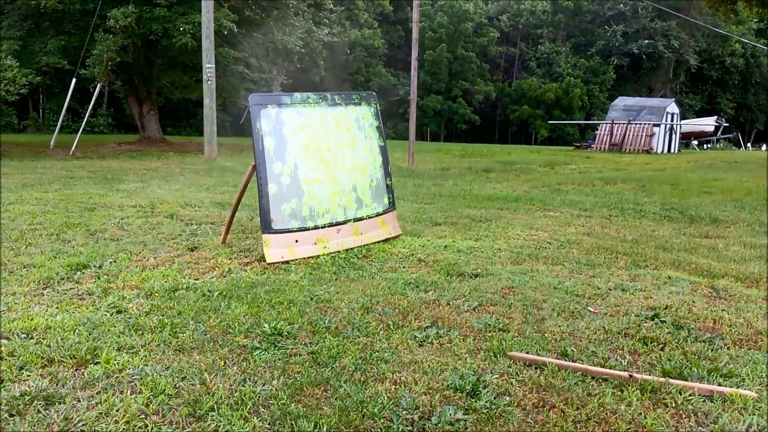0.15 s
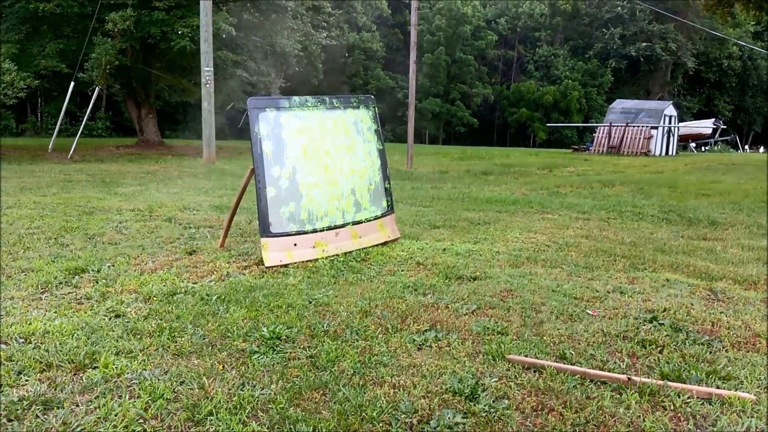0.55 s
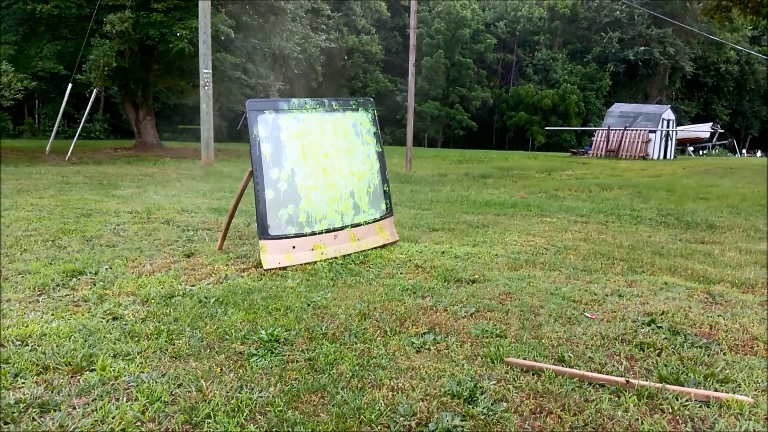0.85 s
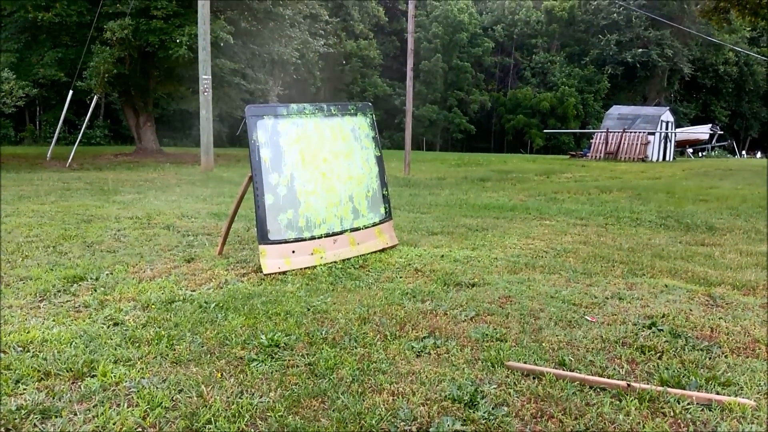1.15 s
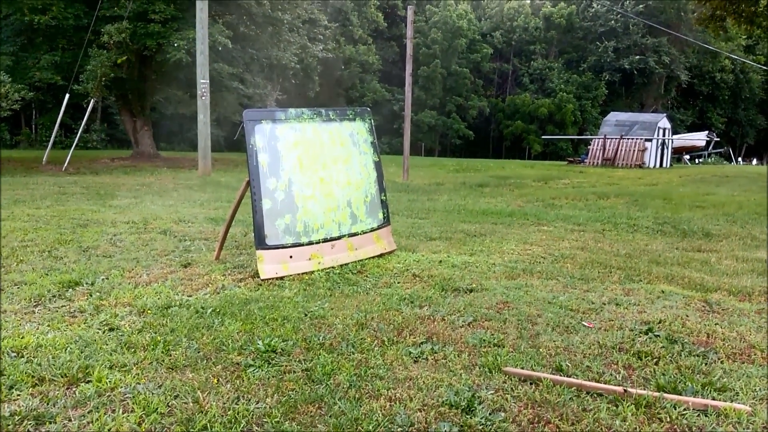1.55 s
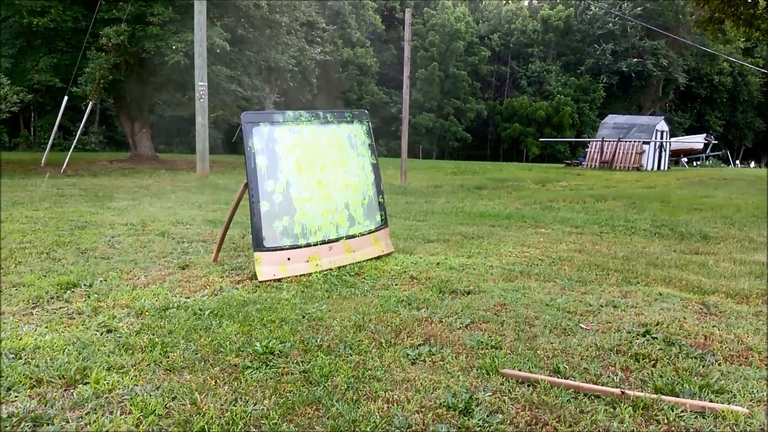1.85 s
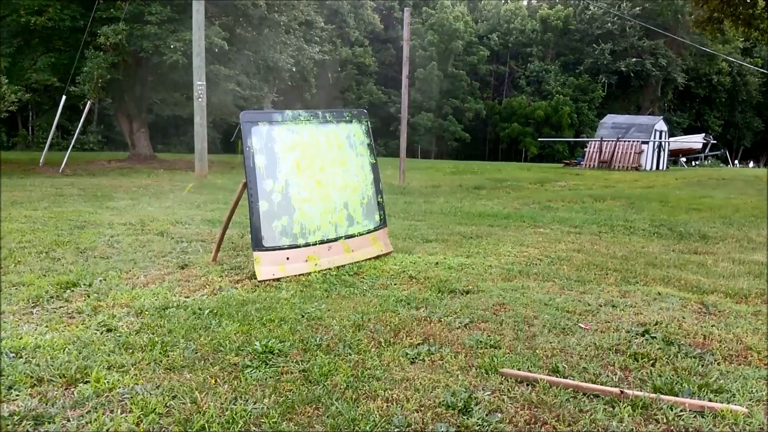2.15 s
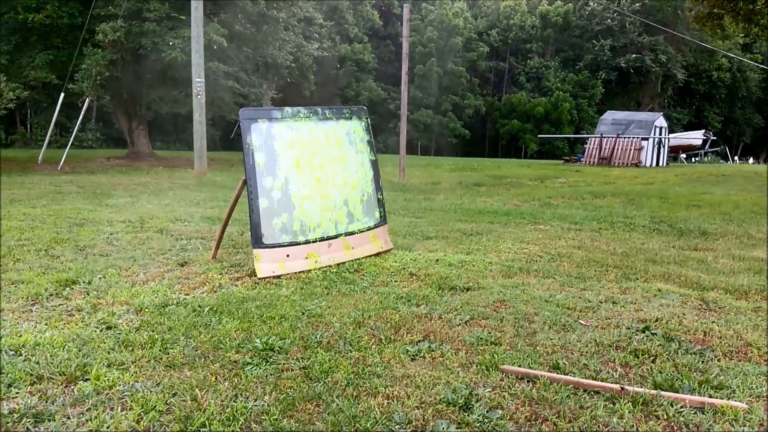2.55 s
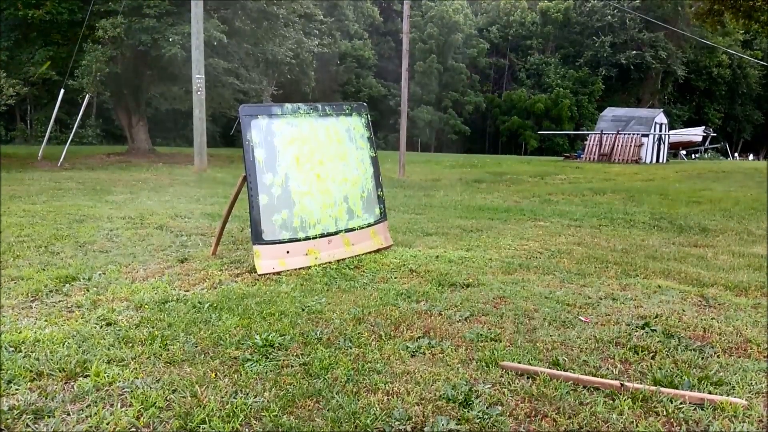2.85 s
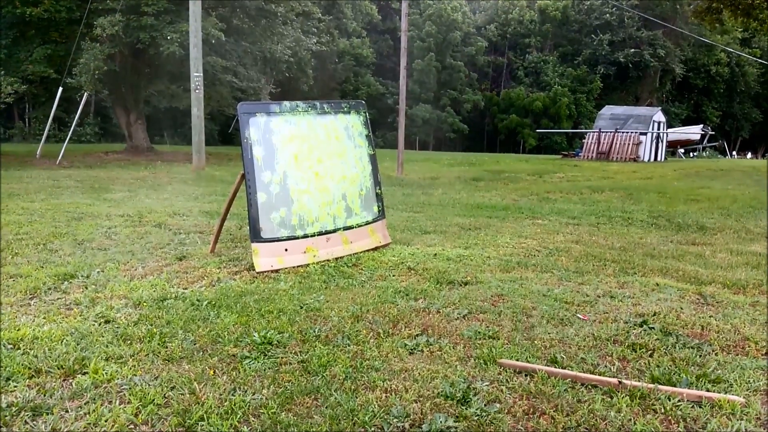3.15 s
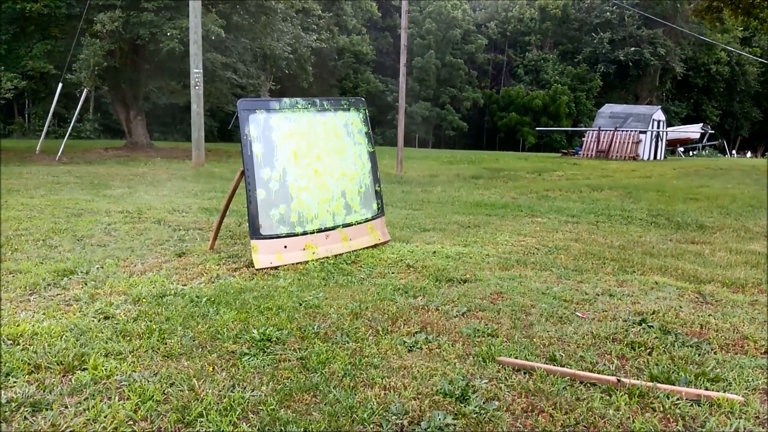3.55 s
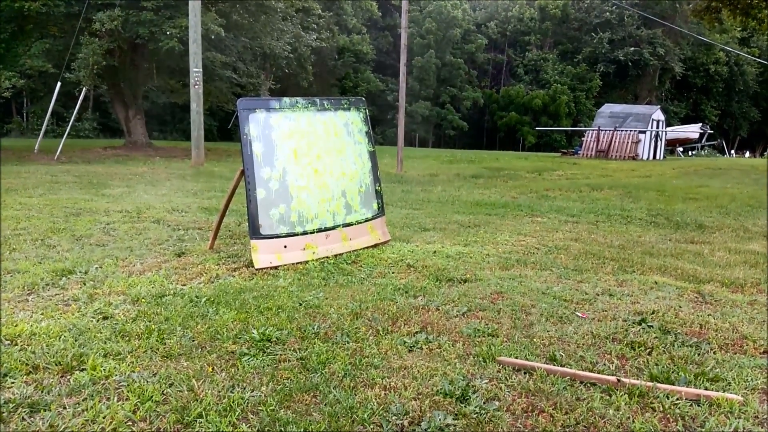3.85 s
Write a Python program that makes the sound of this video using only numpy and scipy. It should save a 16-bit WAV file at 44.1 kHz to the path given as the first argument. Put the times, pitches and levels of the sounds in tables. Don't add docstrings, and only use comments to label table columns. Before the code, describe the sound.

Paintballs pop and splat rapidly against a stiff panel outdoors, then the echo fades to quiet.

```python
import sys
import numpy as np
from scipy import signal
from scipy.fft import rfft, irfft, next_fast_len
from scipy.io import wavfile
from scipy.ndimage import uniform_filter1d

SR = 44100
rng = np.random.default_rng(int(sys.argv[2]) if len(sys.argv) > 2 else 0)


def unload_audio(sound):
    columns = np.transpose(np.atleast_2d(sound))
    steps = np.round(np.clip(columns, -1, 1) * 32767)
    wavfile.write(sys.argv[1], SR, steps.astype(np.int16))


def volts_from_db(level):
    exponent = np.asarray(level, float) / 20
    return 10 ** exponent


N = 176400

# f/Hz, density/dB per Hz
LAWN_SPECTRUM = [(18, -33.5), (30, -12.5), (124, -3), (157, -5), (355, -13), (540, -16.5), (1430, -17.5),
                 (1540, -21.5), (16000, -37.5)]
# f/Hz, left/dB, right/dB, t60/s, near part/dB
TREE_BANDS = [(165, -51.5, -25, 0.4, 4.5), (710, -40, -41, 1.4, 6.5), (1364, -39.5, -36.5, 3.58, 5),
              (2610, -43.5, -39.5, 1.36, 3), (3956, -35, -31.5, 1.8, 9), (4990, -41, -36.5, 1.4, 2),
              (7100, -48.5, -52, 1.1, -8), (13020, -71.5, -71, 1.1, 9)]
# t/s, level/dB
EARLIER_HITS = [
    (-.2, -4),
    (-.1, -3.5),
    (-.045, -15.5),
]
# t/s, level/dB, thud/dB, ring/dB
SINGLE_HITS = [
    (0.011, -11.5, 5.5, -4),
    (0.0633, -14.5, 12.5, -0.5),
    (0.146, -10, 3.5, 0.5),
    (0.245, -13, 3, -1),
    (0.4873, -10.5, -2, -11),
    (0.7473, -11, 3, -6),
    (0.8743, -11.5, 2.5, 1),
    (0.9855, -9, 4.5, 2),
    (2.3412, -10.5, 4, -13.5),
    (2.567, -11, 0.5, -6.5),
]
# t/s, level/dB, thud/dB, ring/dB
RAPID_HITS = [(1.1158, -10, 1.6, -11.5), (1.1671, -13, 1.8, -1.1), (1.2276, -10, 4.2, 1.5),
              (1.2799, -13.5, 1.1, 4), (1.3351, -10, 1.1, -5.5), (1.3895, -10.5, 2.4, 1),
              (1.4375, -11.5, 1.5, -6), (1.498, -10.5, 2.3, -3), (1.5482, -14, 0.81, -0.5),
              (1.5968, -14, 2.3, 4.5), (1.6415, -13.5, 2, -1.5), (1.7009, -12, 0.75, -4),
              (1.755, -12, 2.3, -1.3), (1.8021, -11, 2, -3), (1.8634, -12.5, 1.2, -2), (1.9148, -13, 1, -1),
              (1.9684, -12.5, 3, -1.5), (2.0268, -10, 0.82, -7), (2.0726, -12.5, 1.1, 0),
              (2.1412, -11.5, 0.92, -14), (2.1898, -11.5, 0.59, 6.5), (2.2349, -11.5, 0.94, -1)]
BURST_TREBLE_DB = [1.5, 1.5, 1.5, 1.5, 1.5, 1.5, 1.5, 1.5, 1.5, 1.5, 1.5, 1.5, 1.5, 1.5, 1.5, 1.5, 1.5, 1.5,
                   1.5, 1.5, 1.5, 1.5, 1.5, 1.5, 1.5, 1.5, 1.5, 1.5, 1.5, 1.5, 1.5, 1.5]
# f/Hz, density/dB per Hz
SPLAT_SPECTRUM = [(120, -20), (400, -0.5), (1600, 3.5), (4500, -4.5), (6800, -5), (9100, -2),
                  (13000, -11.5), (16500, -16)]
# f/Hz, level/dB, t60/s
PANEL_MODES = [(73.8, -29.5, 0.033), (119, -28, 0.32), (130, -27.5, 0.45), (161.8, -25, 0.53),
               (175.6, -22, 0.86), (233, -20.5, 0.092), (337, -29, 0.72), (506, -18, 0.084),
               (1090, -11.5, 0.09), (1197, -20, 0.12), (1387, -2, 0.077), (1510, -9, 0.061),
               (1766, -6.5, 0.11), (2638, -21, 0.054)]
# delay/s, left/dB, right/dB, centre f/Hz, width/Hz
HIT_ECHOES = [(.0522, -5, 6, 4000, 1500), (.0522, -20, -12, 3000, 5000), (.0765, -19, -12, 4000, 5000)]
# delay/s, left/dB, right/dB, centre f/Hz, width/Hz
CRACK_ECHOES = [(.0522, -11, -1, 4400, 1800), (.0535, -14, -3, 3650, 500), (.0522, -34, -27, 9000, 8000),
                (.0525, -18, -14, 1700, 1200), (.0765, -24, -16, 4500, 4000), (.0385, -28, -26, 4000, 3000)]
# delay/s, left/dB, right/dB, centre f/Hz, width/Hz
POP_ECHOES = [(.0415, -14, -13, 1100, 2500)]
# t/s, level/dB
SHOTS = [(0.0917, -16), (0.3244, 0.5), (.577, 3.5), (0.7099, 2.5), (.8233, -1), (0.9544, -1),
         (1.0106, -8.5), (1.0639, 0), (1.116, -7.5), (1.169, -18.5), (1.2239, 2), (1.2779, -3.5),
         (1.3332, -1.5), (1.3861, -11), (1.431, -10), (1.4873, -7.5), (1.5404, -3), (1.5918, -3),
         (1.64, -8.5), (1.6969, 1), (1.751, 0.5), (1.804, -4), (1.8568, -2.5), (1.915, -11.5), (1.9803, -8),
         (2.030, -8.5), (2.073, -1.5), (2.128, -13.5), (2.186, -14), (2.4077, 0.5)]
# f/Hz, left/dB, right/dB, t60/s
BARREL_MODES = [(920, -12, -11, .05), (1500, -20, -18, .03), (2000, -22, -17, .03), (3050, -25, -15, .03),
                (4300, -28, -22, .03)]
# t/s, thump/dB, knock/dB
FRAME_HITS = [
    (1.6426, -16, -15),
    (1.7015, -14.5, -26),
    (1.757, -13.5, -30.5),
]
# t/s, level/dB
DRIPS = [
    (3.2447, -58),
    (3.3593, -54.5),
    (3.3723, -50),
    (3.6138, -51),
    (3.7395, -63.5),
    (3.7514, -49.5),
]

CRACK_DELAY_S = 0.000843


def curve(table, hz, col):
    table = np.array(table, float)
    return np.interp(np.log(np.maximum(hz, 1)), np.log(table[:, 0]), table[:, col])


def colour(x, gain):
    size = next_fast_len(x.shape[-1] + 4096)
    hz = np.arange(size // 2 + 1) * SR / size
    return irfft(rfft(x, size) * gain(hz), size)[..., :x.shape[-1]]


def band(x, hz, width_hz):
    return signal.lfilter(*signal.iirpeak(hz, hz / width_hz, SR), x)


def fade(t, t60_s):
    return (t >= 0) * volts_from_db(-60 * np.maximum(t, 0) / t60_s)


def bell(x):
    return np.exp(-.5 * x ** 2)


def stereo(left, right):
    return np.array([[left], [right]])


def add(out, x, s):
    i = int(s * SR)
    part = out[:, i:i + x.shape[1]]
    part += x[:, :part.shape[1]]


def pair(count):
    alike_hz = 586
    a, b = rng.standard_normal((2, count))
    alike = lambda hz: .92 / (1 + (hz / alike_hz) ** 2)
    return np.array([a, colour(a, alike) + colour(b, lambda hz: np.sqrt(1 - alike(hz) ** 2))])


def lawn():
    level_db, pan_db, swell_db = -62.5, -3.5, 2.0
    air = colour(pair(N), lambda f: volts_from_db(curve(LAWN_SPECTRUM, f, 1)))
    swell = uniform_filter1d(uniform_filter1d(rng.standard_normal(N), 8000), 8000)
    return air / air.std() * volts_from_db(level_db + swell_db * swell / swell.std() + pan_db * stereo(.5, -.5))


def trees(x):
    start_s, rise_s, near_t60_s, near_hold_s = .037, .012, .2, 0.17
    treeline_s, beyond_t60_s = 0.35, 5.7
    swell_s, swell_width_s, swell_db = .3, 0.032, 1
    t = np.arange(int(1.3 * SR)) / SR - start_s
    noise = pair(len(t))
    response = 0
    for hz in 80 * 2 ** np.arange(0, 7.8, .5):
        left_db, right_db, t60_s, near_db = (curve(TREE_BANDS, hz, col) for col in (1, 2, 3, 4))
        half_octave = colour(noise, lambda f: np.maximum(0, 1 - 2 * abs(np.log2((f + 1) / hz))))
        held = hz > 6000
        near = fade(t - near_hold_s * held, near_t60_s) + (t < near_hold_s) * held
        response = response + volts_from_db(stereo(left_db, right_db)) * half_octave * (fade(t, t60_s) + volts_from_db(near_db) * near)
    response = response * np.clip(t / rise_s, 0, 1) * volts_from_db(-60 * np.maximum(t - treeline_s, 0) / beyond_t60_s)
    response = response * volts_from_db(swell_db * bell((t - swell_s) / swell_width_s))
    return signal.fftconvolve(x[None], response, axes=1)


def burst(level_db, treble_db, lead_s, pan_db):
    splat_db, shared, lag_s, left_treble_db = 4, 0.31, .00006, 3.5
    rise_s, body_t60_s, top_t60_s = .0004, 0.03, 0.015
    spray_db, spray_t60_s = -34, 0.21
    rebound_s, rebound_db, rebound_t60_s = .0022, -3, .007
    crack_db, crack_width_s = 17, .000012
    u = np.arange(4096) / SR - lead_s
    side = stereo(.5, -.5)

    noise = rng.standard_normal((3, 4096))
    noise = np.sqrt(shared) * noise[0] + np.sqrt(1 - shared) * noise[1:]
    common = noise.sum(axis=0) / 1.5
    noise = noise + signal.sosfilt(signal.butter(1, 800, fs=SR, output="sos"), common - noise)
    top = signal.sosfilt(signal.butter(2, 5000, "high", fs=SR, output="sos"), noise)

    late, strong = rng.standard_normal(2)
    again_s = CRACK_DELAY_S + rebound_s * (1 + 0.13 * late)
    spray = volts_from_db(spray_db) * fade(u, spray_t60_s)
    rebound = volts_from_db(rebound_db + 2 * strong) * fade(u - again_s, rebound_t60_s)
    shape = lambda t60_s: np.clip(u / rise_s, 0, 1) ** 2 * fade(u, t60_s) + spray + rebound

    v = (u - CRACK_DELAY_S) / crack_width_s
    crack = volts_from_db(crack_db + treble_db) * v * bell(v)
    splat = (noise - top) * shape(body_t60_s) + volts_from_db(treble_db) * top * shape(top_t60_s) - crack

    def ports(f):
        tilt_db = pan_db + left_treble_db * (f / 12000) ** 2
        return volts_from_db(curve(SPLAT_SPECTRUM, f, 1) + side * tilt_db) * np.exp(2j * np.pi * f * side * lag_s)

    return volts_from_db(level_db + splat_db) * colour(splat, ports)


def panel_ring(level_db, thud_db, ring_db):
    scatter_db, jitter, port_phase = 4, .07, 0.21
    low_longest_t60_s, high_longest_t60_s = 0.49, 0.053
    t = np.arange(SR // 4) / SR
    hz, db, t60_s = np.array(PANEL_MODES).T[:, :, None]
    phase, level, pitch = rng.standard_normal((3, len(PANEL_MODES), 1))
    low = hz < 600
    gain = volts_from_db(level_db + db + np.where(low, thud_db, ring_db) + scatter_db * level)
    envelope = gain * fade(t, np.minimum(t60_s, np.where(low, low_longest_t60_s, high_longest_t60_s)))
    turn = 2 * np.pi * hz * (1 + jitter * np.minimum(hz / 1000, 1) * pitch) * t
    offset = port_phase * phase * np.minimum(turn, 1)
    ring = np.array([(envelope * np.sin(turn + k * offset)).sum(axis=0) for k in (1, -1)])
    return ring * np.minimum(1, 10 - 40 * t)


def panel():
    lead_s, pan_db = .002, -2
    out = np.zeros((2, N))
    for (s, level_db, thud_db, ring_db), treble_db in zip(SINGLE_HITS + RAPID_HITS, BURST_TREBLE_DB):
        add(out, burst(level_db, treble_db, lead_s, pan_db), s - lead_s)
        ring = panel_ring(level_db, thud_db, ring_db) * volts_from_db(pan_db * stereo(.5, -.5))
        add(out, ring, s + CRACK_DELAY_S)
    return out


def echoes(x, table):
    out = np.zeros((2, N))
    for s, left_db, right_db, hz, width_hz in table:
        slap = band(band(x[-1], hz, width_hz), hz, width_hz)
        add(out, slap * volts_from_db(stereo(left_db, right_db)) * stereo(-1, 1), s)
    return out


def gas_pulse(u):
    width_s, suck_s, suck_share = .00006, .0003, .95
    hiss_db, hiss_t60_s, hiss_hz, hiss_width_hz = -17, .03, 3100, 5800
    suck = suck_share * width_s / suck_s * (u > 0) * np.exp(-abs(u) / suck_s) * np.sqrt(2 * np.pi)
    hiss = band(band(rng.standard_normal(u.shape), hiss_hz, hiss_width_hz), hiss_hz, hiss_width_hz)
    return bell(u / width_s) - suck + volts_from_db(hiss_db) * fade(u, hiss_t60_s) * hiss


def barrel_ring(u):
    valve_s, rise_s, jitter = .0045, .00012, .025
    valve = 0.031 + 0.55 * np.exp(-(u / valve_s) ** 4)
    out = np.zeros(u.shape)
    for hz, left_db, right_db, t60_s in BARREL_MODES:
        level, pitch = rng.standard_normal(2)
        envelope = volts_from_db(stereo(left_db, right_db) + level) * fade(u, t60_s) * valve * np.clip(u / rise_s, 0, 1)
        out += envelope * np.cos(2 * np.pi * hz * (1 + jitter * pitch) * u)
    return out


def marker():
    pop_db, start_s, left_lag_s = -3.5, .00027, .00037
    thump_db, thump_hz, thump_t60_s = -31.5, 118, 0.068
    out = np.zeros((2, N))
    u = np.arange(4096) / SR - start_s - stereo(left_lag_s, 0)
    for s, db in SHOTS:
        thump = volts_from_db(thump_db) * fade(u, thump_t60_s) * np.sin(2 * np.pi * thump_hz * u) * stereo(.3, 1)
        add(out, volts_from_db(db + pop_db) * (gas_pulse(u) + barrel_ring(u) + thump), s)
    return out


def frame():
    hz, t60_s, knock_s, start_s = 115, 0.013, 0.00029, .00027
    lead_s = 3 * knock_s
    out = np.zeros((2, N))
    u = np.arange(4096)[None] / SR - start_s
    for s, db, knock_db in FRAME_HITS:
        thump = volts_from_db(db) * fade(u - lead_s, t60_s) * np.sin(2 * np.pi * hz * (u - lead_s))
        knock = volts_from_db(knock_db) * bell(u / knock_s - 2)
        add(out, (thump - knock) * stereo(1, -.3), s - lead_s)
    return out


def drips():
    hz, width_hz, t60_s, trim_db = 4800, 5000, .01, -1
    out = np.zeros((2, N))
    envelope = fade(np.arange(1024) / SR, t60_s)
    for s, db in DRIPS:
        add(out, volts_from_db(db + trim_db) * band(rng.standard_normal((2, 1024)) * envelope, hz, width_hz), s)
    return out


def scene():
    bang_db, crack_echo_db, pop_wet_db = 14.5, 3.5, -17
    hits = panel()
    pops = marker() + frame()
    bangs = np.zeros((1, N + SR))
    for s, db, *_ in EARLIER_HITS + SINGLE_HITS + RAPID_HITS:
        add(bangs, volts_from_db(db + bang_db) * np.ones((1, 1)), s + 1)
    cracks = volts_from_db(crack_echo_db) * np.roll(bangs[:, SR:], int(CRACK_DELAY_S * SR))
    add(bangs, volts_from_db(pop_wet_db) * pops[1:], 1)
    wash = trees(bangs[0])[:, SR:SR + N]
    slaps = echoes(hits, HIT_ECHOES) + echoes(cracks, CRACK_ECHOES) + echoes(pops[1:], POP_ECHOES)
    return hits + pops + slaps + wash + lawn() + drips()


def band_limit(x):
    return signal.sosfilt(signal.butter(12, 16970, fs=SR, output="sos"), x)


def record(dry):
    clip_at, top_hz = 1.05, 16100
    x = signal.sosfilt(signal.butter(2, 50, "high", fs=SR, output="sos"), dry)
    x = clip_at * np.tanh(x / clip_at) * stereo(1, -1)
    x = colour(x, lambda f: np.clip((top_hz + 500 - f) / 1000, 0, 1))
    return band_limit(x)


dry = scene()
out = record(dry)
unload_audio(out)
```